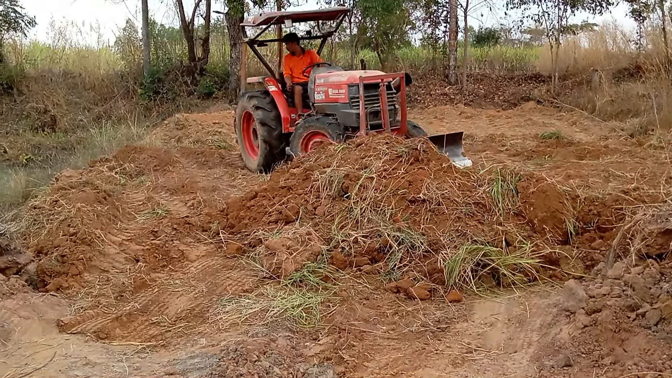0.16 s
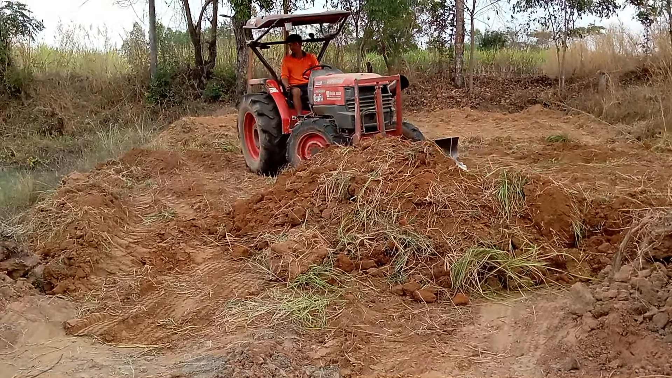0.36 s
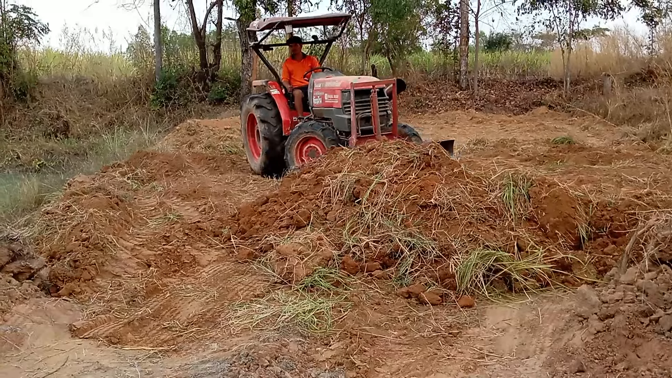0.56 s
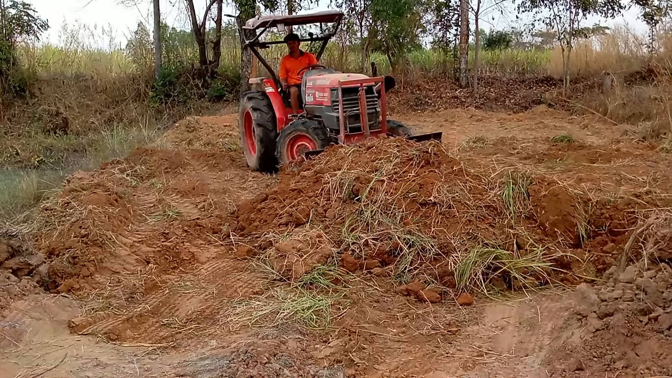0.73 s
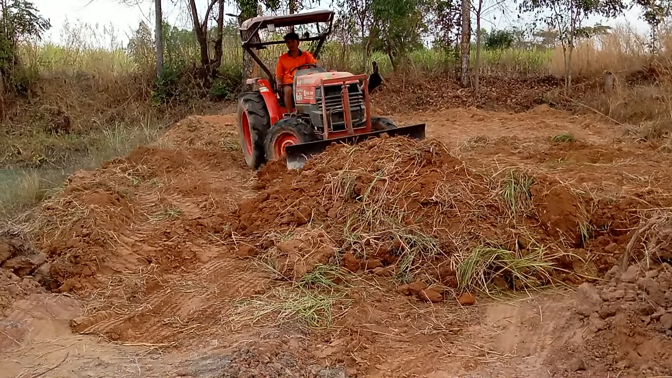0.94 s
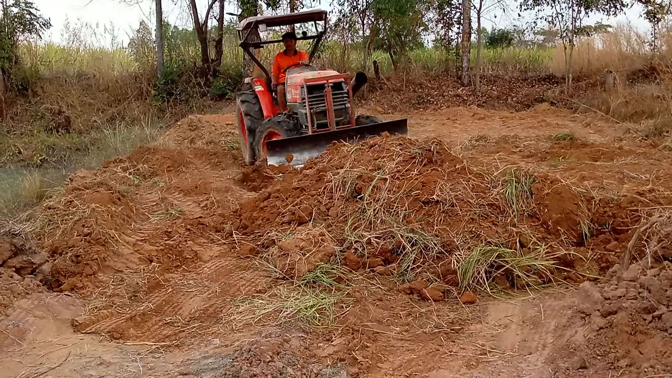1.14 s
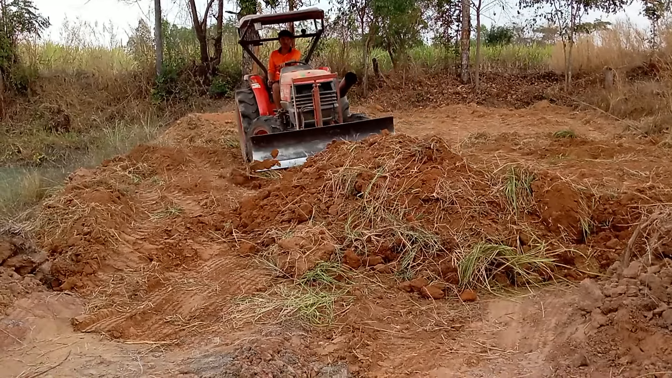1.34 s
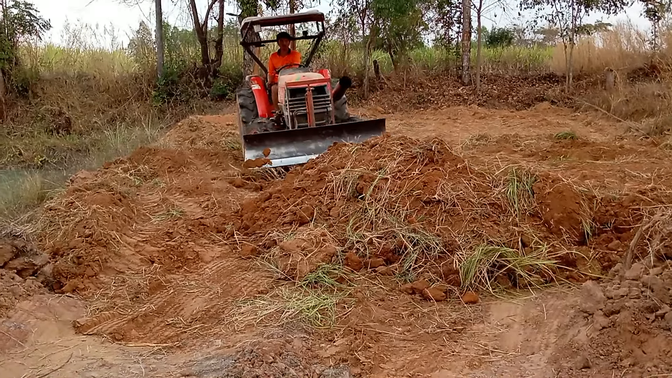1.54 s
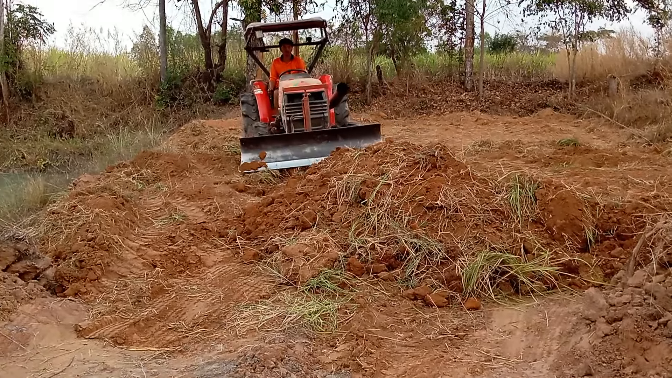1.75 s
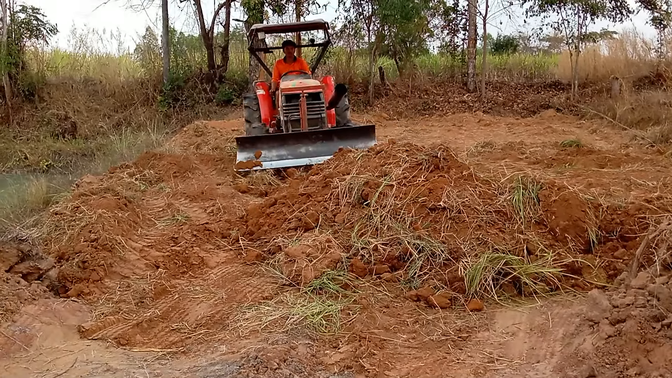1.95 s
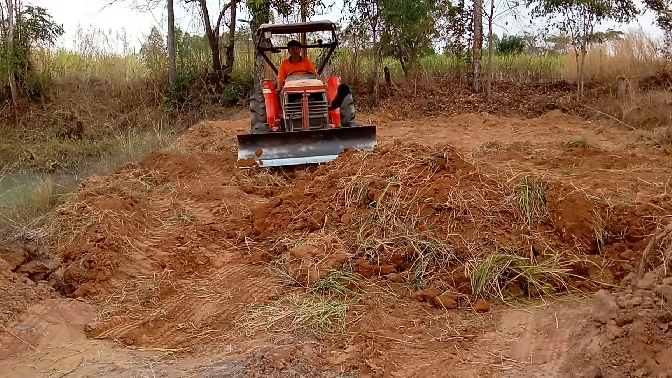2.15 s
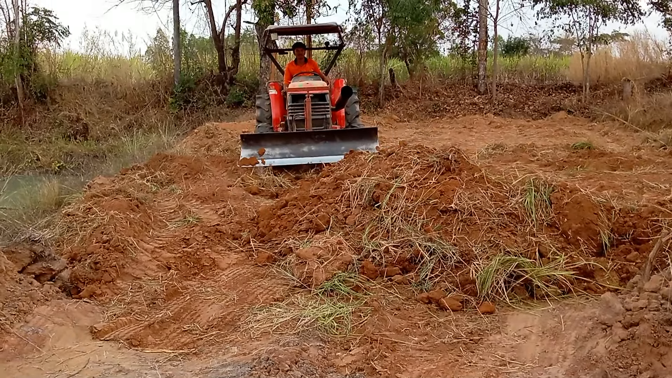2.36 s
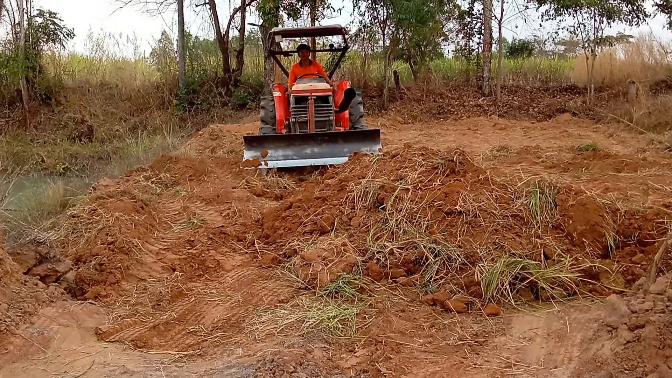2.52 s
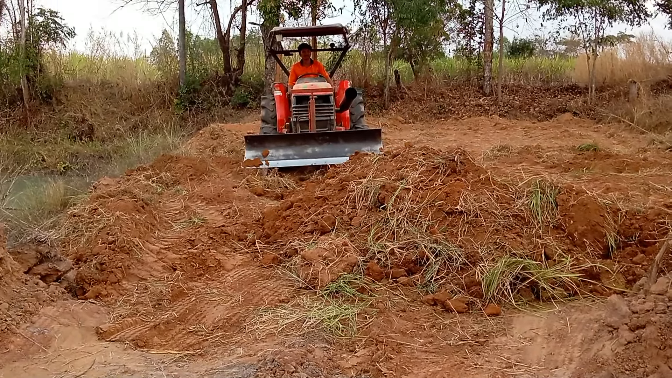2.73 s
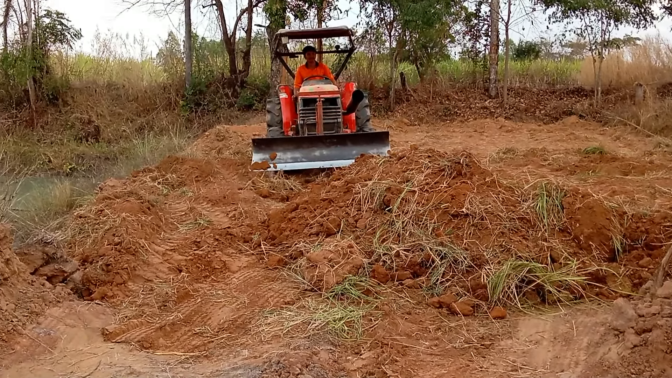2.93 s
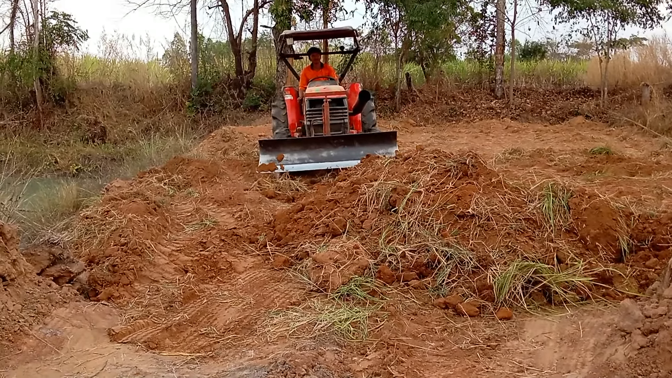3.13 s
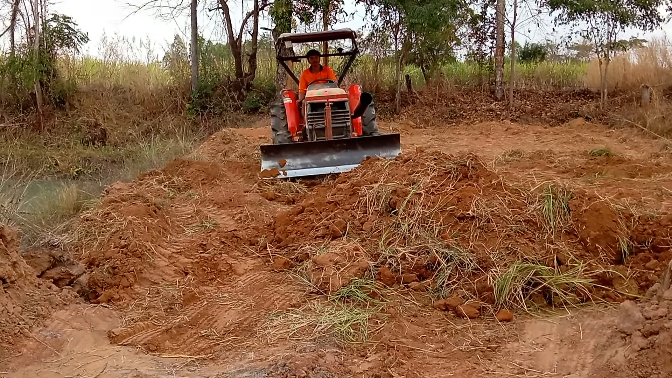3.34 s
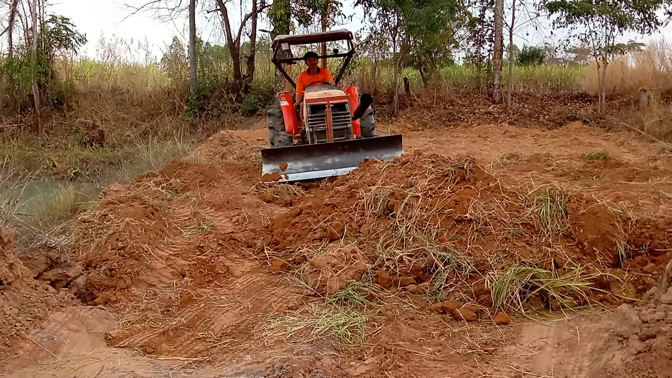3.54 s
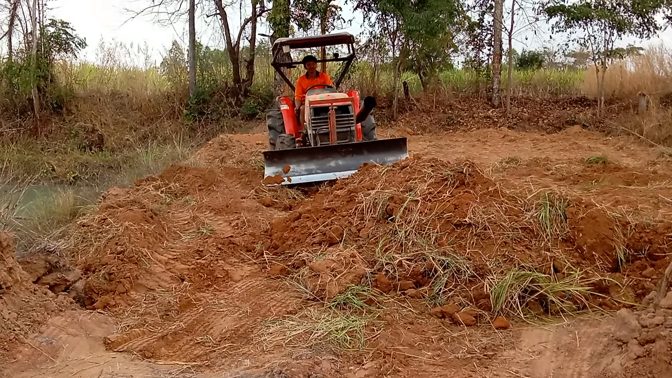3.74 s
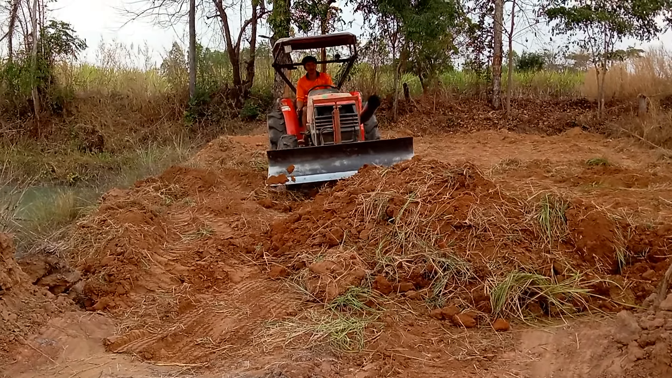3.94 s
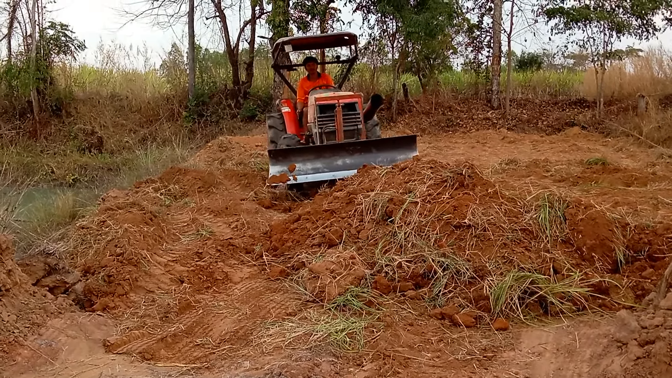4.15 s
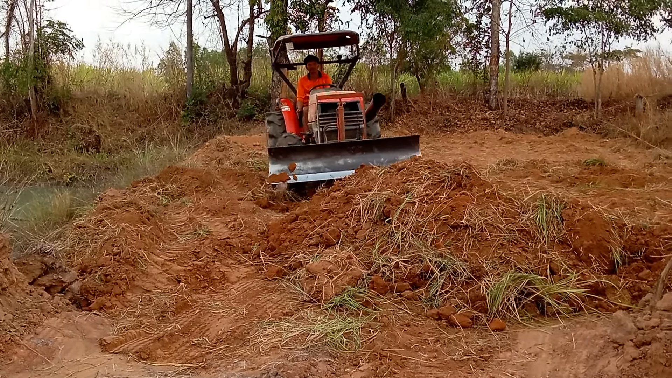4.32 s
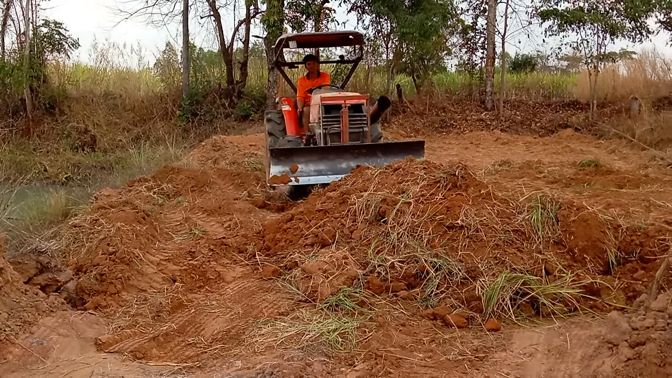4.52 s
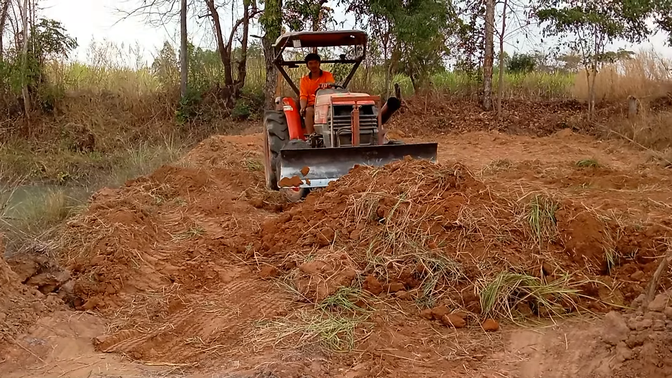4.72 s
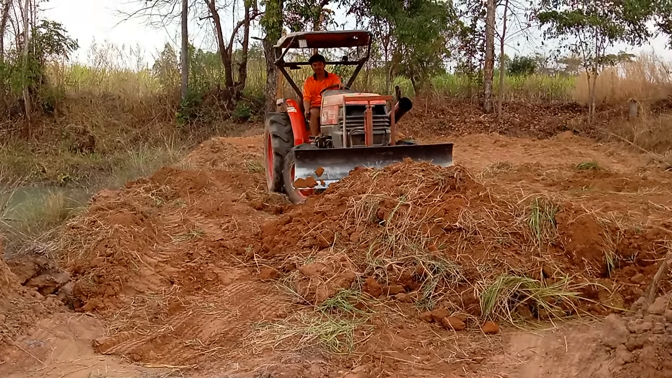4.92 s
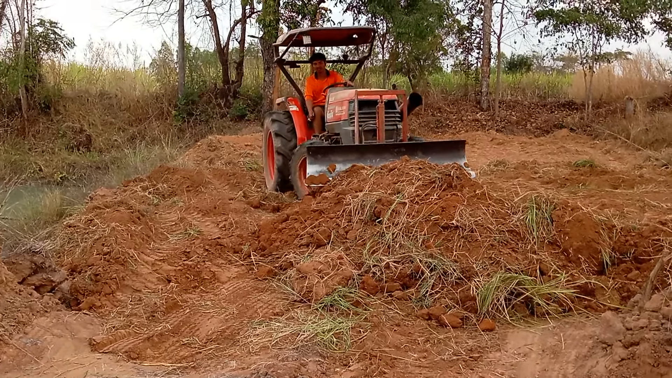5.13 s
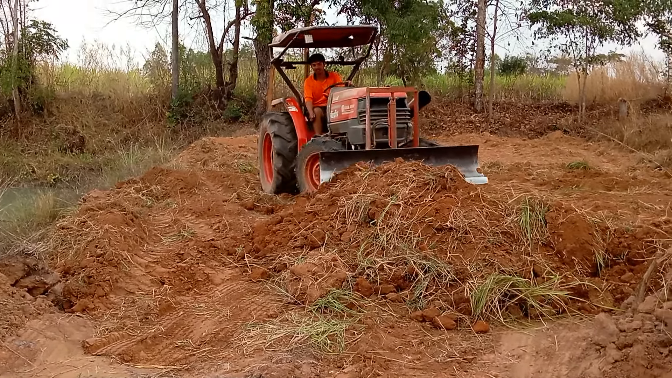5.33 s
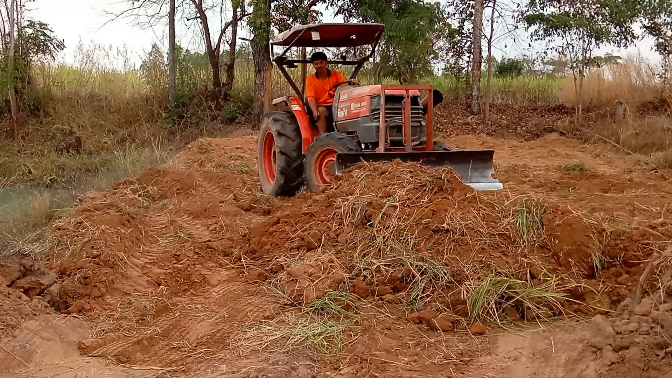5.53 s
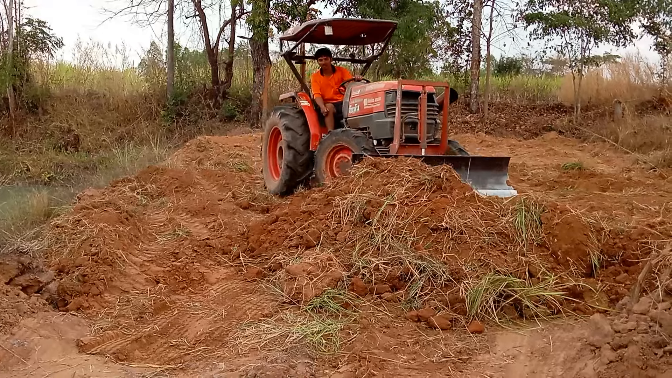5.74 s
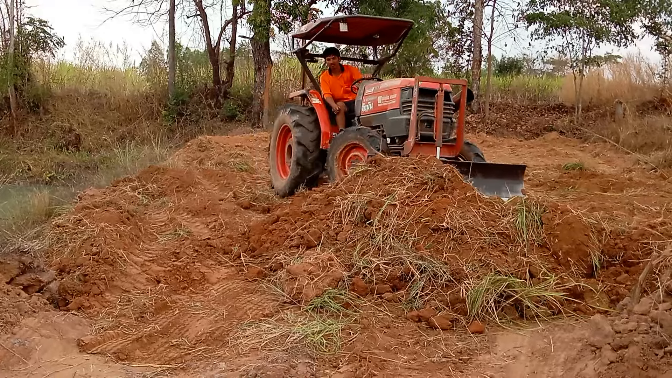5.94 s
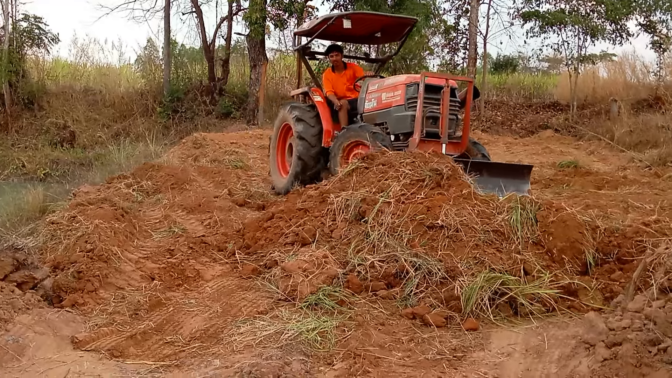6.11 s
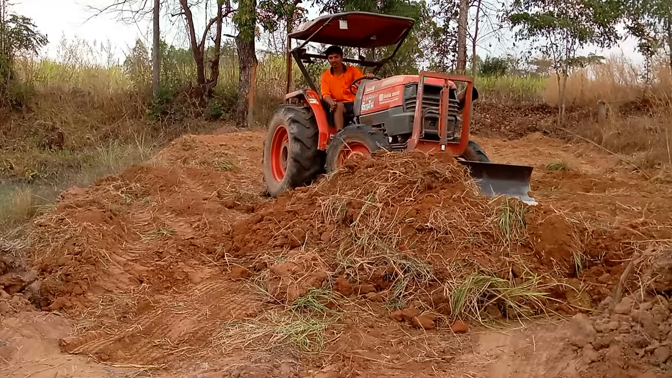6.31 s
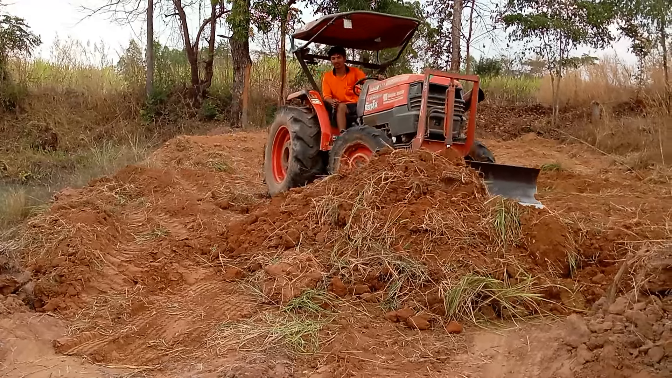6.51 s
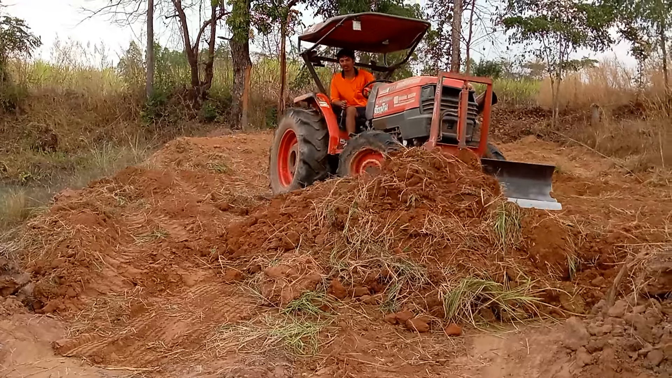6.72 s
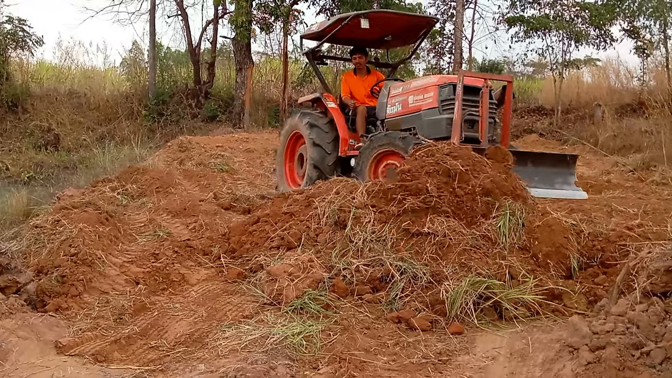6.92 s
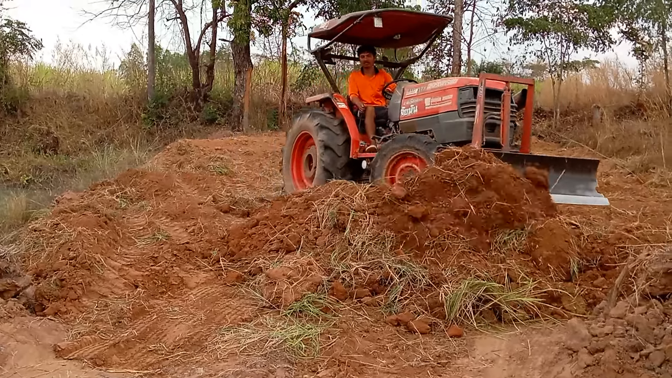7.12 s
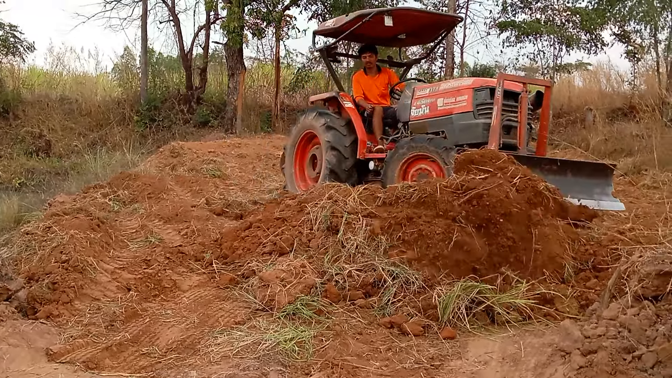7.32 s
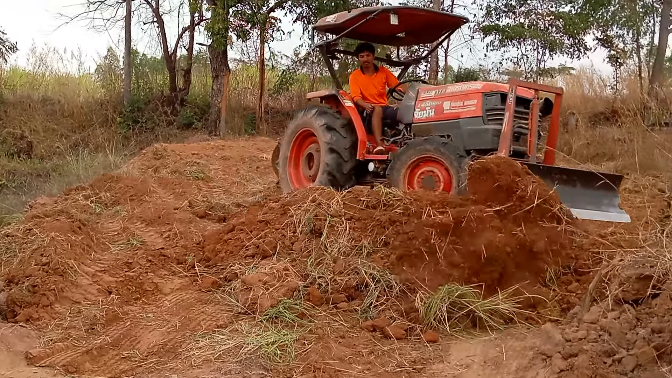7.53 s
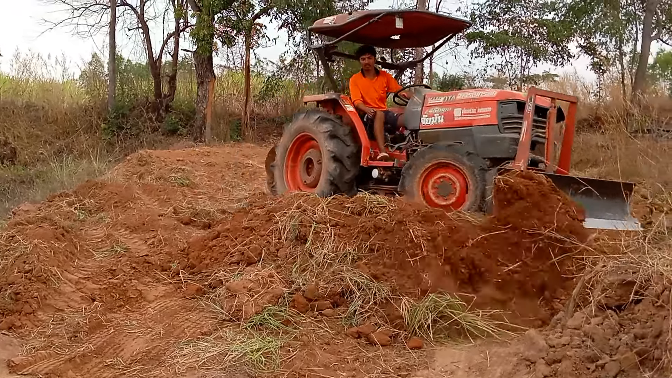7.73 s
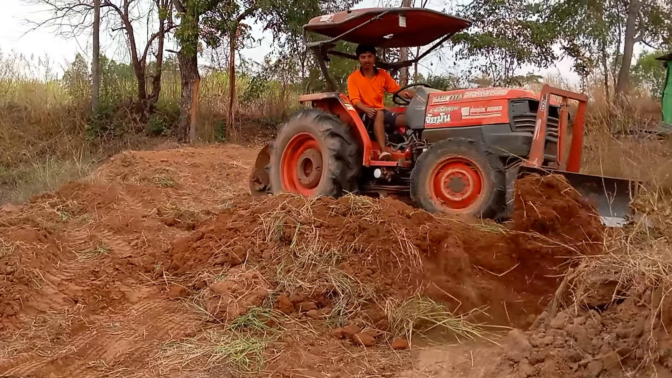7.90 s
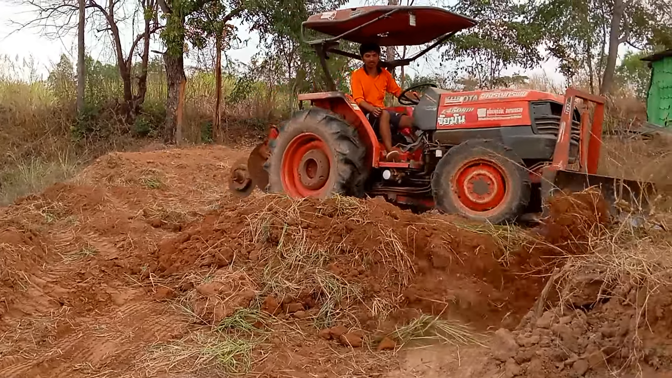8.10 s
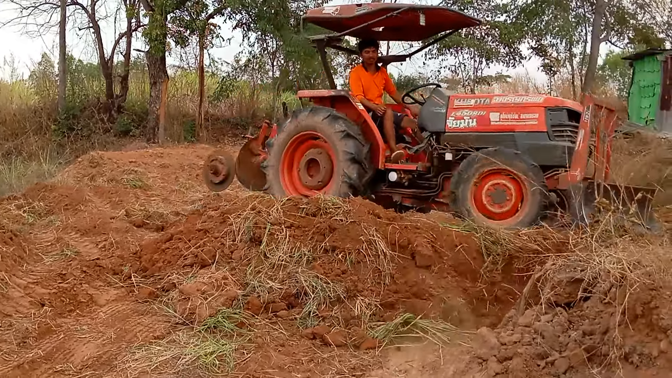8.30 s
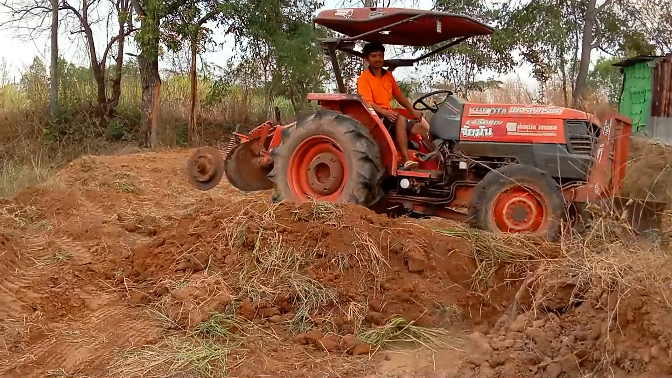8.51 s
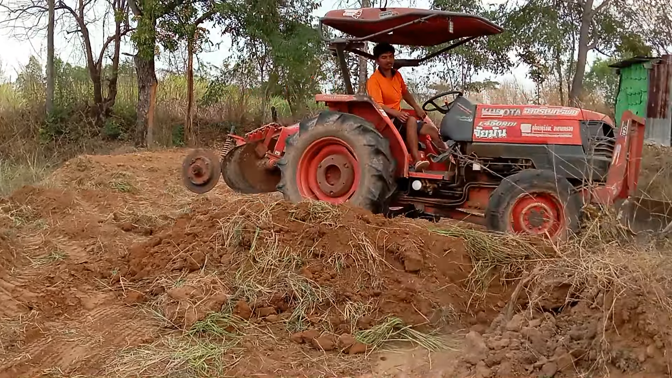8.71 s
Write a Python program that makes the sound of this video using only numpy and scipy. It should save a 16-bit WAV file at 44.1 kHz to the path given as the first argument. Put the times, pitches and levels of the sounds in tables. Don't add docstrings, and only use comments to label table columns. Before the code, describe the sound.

A diesel tractor clatters at idle, stumbles as its fuel cuts in and out, then revs up and pulls hard before easing off.

```python
import sys
import numpy as np
from scipy import signal
from scipy.fft import rfft, irfft, next_fast_len
from scipy.io import wavfile
from scipy.ndimage import uniform_filter1d

SR = 44100
rng = np.random.default_rng(int(sys.argv[2]) if len(sys.argv) > 2 else 0)


def waveform_to_disk(signal):
    frames = np.transpose(np.atleast_2d(signal))
    scaled = np.clip(frames, -1, 1) * 32767
    samples = np.round(scaled).astype(np.int16)
    wavfile.write(sys.argv[1], SR, samples)


def amplitude_ratio(level_db):
    exponent = np.asarray(level_db, float) / 20
    return 10 ** exponent


N = 386316
IDLE_INTERVAL = .035

# surplus of the exhaust puff [ratio], knock_db
CYLINDERS = [(1, -.4), (.25, -.3), (-1, .9), (-.25, .2)]
# middle_s, half_length_s
SURGES = [(2.1, .24), (2.448, .055), (2.744, .02), (2.866, .055), (3.119, .05)]
# start_s, knock_db on fuel, load [0-1], flank turned to the microphone [0-1]
WORK = [(0, -32.5, 0.62, 0.5), (.24, -32.5, .3, 0.54), (.62, -24.5, 0.08, 0.3), (1.1, -33, 0.03, 0.14),
        (1.8, -30.5, 0.1, 0), (3.285, -37, 0.04, 0.35), (3.34, -21.5, 0.2, 0.1), (3.8, -25, 0.28, 0.34),
        (4.3, -27, 0.38, 0.38), (5.05, -29, 0.37, 0.53), (5.55, -26.5, 0.53, 0.66), (5.85, -28, 0.86, 0.8),
        (6.5, -27, 0.94, 0.5), (6.8, -25, 0.79, 0.66), (7.3, -30.5, 0.77, 0.74), (7.6, -32, 0.79, 1),
        (8, -30.5, 0.7, 1), (8.4, -25, 0, 0.94)]


def exhaust(at, cylinder):
    # centre_hz, width_hz, level_db
    silencer = [(90.4, 15.7, 0.5), (110.2, 12.6, 0.5), (139, 50, -11)]
    tailpipe = [(170.6, 8.4, 0.5), (199.8, 17, 20)]
    manifold = [(110, 110, -3), (159.7, 59, 10), (227, 70, 7.5)]
    outlet = [(250, 16, 21.5), (403, 190, 4.5), (536, 62, 11.5), (655, 23, 16.5), (954, 110, -24),
              (1110, 34.5, 19)]
    # centre_hz, width_hz, level_db
    upright = [(261.4, 48, 0)]
    # pitch_hz, level_db
    flow = [(15, -32), (45, -18), (90, -14.5), (200, -4), (270, -12), (330, -11.5), (450, -44)]
    dry_scatter_db = 3.5
    leaky_cylinder, leak_db, leak_below = 3, 5.5, 30

    chance = rng.standard_normal((len(at), 2))
    dry_db = dry_scatter_db * chance[:, 1] + leak_db * (cylinder == leaky_cylinder)
    dry_db = (1.5 - fuel()[0][at]) * dry_db * (speed()[at] < leak_below)
    sizes = amplitude_ratio(.6 * chance[:, 0] + dry_db)
    surplus = np.transpose(CYLINDERS)[0, cylinder]

    def ring(table):
        return lambda f: modes(table)(f) * f ** 2 / (f ** 2 + 85 ** 2) / (1 + (f / 255) ** 12)

    def mouth(f):
        return modes(outlet)(f) * f ** 4 / (f ** 4 + 235 ** 4) / (1 + (f / 1100) ** 6)

    level = levels(lag_s=0)
    when = at - SR * 0.004575
    thump = played(when, sizes, level['thump'] - .4, ring(silencer))
    pipe = played(when, sizes, level['pipe'] - .4, ring(tailpipe))
    uneven = played(when, surplus, level['uneven'], ring(manifold))
    ragged = when + SR * .00005 * chance[:, 1]
    bark = played(ragged, sizes + 0.5 * surplus, level['bark'] - 6.5, mouth)
    rumble = amplitude_ratio(level['rumble']) * rush(slope(flow), patchy_db=1.0)
    stack = played(when, sizes, level['stack'], lambda f: modes(upright)(f) ** 3)
    return thump + pipe + stack + uneven + bark + rumble


def knock(at, cylinder):
    # centre_hz, width_hz, level_db
    block_modes = [(607, 67, -10), (1040, 153, -12.5), (1363, 120, -4), (2070, 574, -4), (2167, 86, 2),
                   (2303, 97, -8), (3337, 200, -8.5), (2498, 79, -8.5)]
    head_modes = [(4010, 540, 4), (4785, 106, -2.5), (5283, 140, 5), (6000, 210, -7), (6558, 148, 1),
                  (6620, 156, 1.5), (7220, 720, -8), (8510, 155, -11.5), (9110, 130, -9.5),
                  (10020, 290, -10.5), (10800, 380, -16.5), (12870, 1550, -10), (13900, 1370, -2)]
    edge_kept = 0.88

    _, knock_db, droop_db = fuel()
    level = levels(lag_s=0)
    chance = rng.standard_normal((len(at), 3))

    def angle(share):
        return np.clip(at + np.gradient(at) * share, 0, N).astype(int)

    start = angle(-.24 + .012 * chance[:, 0])
    own_db = knock_db[at] + np.transpose(CYLINDERS)[1, cylinder] + 1.3 * chance[:, 1]
    block = bursts(start, cylinder, block_modes, own_db + 4.5, rise_s=.0018, t60_s=.034,
                   scatter_db=4.5, level=level)

    soft_db = .9 * np.minimum(own_db + 40, 0) * 2
    edge_db = own_db + level['treble'][at] + soft_db + edge_kept * droop_db[at] + 2.7 * chance[:, 2]
    damped = [(c, 1.15 * w, db) for c, w, db in head_modes]
    head = bursts(start, cylinder, damped, edge_db, rise_s=.0025, t60_s=.024, scatter_db=4.5, level=level)

    seat_db = own_db - knock_db[at] + level['valves'][at]
    valves = bursts(angle(.36), cylinder, block_modes + head_modes[:6], seat_db, rise_s=.004, t60_s=.055,
                    scatter_db=4, level=level)
    return block + head + valves


def bursts(at, cylinder, table, level_db, rise_s, t60_s, scatter_db, level):
    size, habit = 1536, .7
    interval = np.gradient(at)
    pace = (IDLE_INTERVAL * SR / interval[:, None]) ** .8
    t = np.arange(size) / SR * pace
    shape = (1 - np.exp(-t / rise_s)) ** 2 * amplitude_ratio(-60 * t / t60_s)

    hz = np.fft.rfftfreq(size, 1 / SR)
    each = np.array([(-1) ** k * amplitude_ratio(db) * modes([(c, 1.5 * w, 0)])(hz) ** 2
                     for k, (c, w, db) in enumerate(table)])
    centre, now = np.transpose(table)[0], np.minimum(at, N - 1)
    shade_db = np.outer(level['shade'][now], (centre > 7200) & (centre < 12000))
    shade_db = shade_db + np.outer(level['top'][now], centre > 12000)
    colour = amplitude_ratio(scatter_db * rng.standard_normal((len(at), len(table))) + shade_db) @ each

    usual = rng.standard_normal((len(CYLINDERS), size))[cylinder]
    noise = habit * usual + np.sqrt(1 - habit ** 2) * rng.standard_normal((len(at), size))
    rows = irfft(rfft(shape * noise) * colour, size)
    energy = interval / np.sum(rows ** 2, axis=1)
    rows = rows * (np.sqrt(energy) * amplitude_ratio(level_db))[:, None]
    return np.bincount((at[:, None] + np.arange(size)).ravel(), rows.ravel())[:N]


def running_gear(count):
    # pitch_hz, level_db
    air = [(380, -27), (480, -6), (650, -3.5), (1400, -2.5), (2050, -2), (2500, -10), (3000, -8),
           (3500, -18.5), (3900, -74)]
    # centre_hz, width_hz, level_db
    teeth = [(3360, 400, 2.5), (5100, 460, 1.5), (6143, 410, 1.5), (6830, 340, 1), (7230, 360, -0.5),
             (7750, 300, -1.5), (8790, 580, -5), (9670, 510, -4), (10400, 570, -5.5)]
    # pitch_hz, level_db
    hiss = [(1760, -37), (3000, 15), (5920, 7), (7120, -24), (8110, -15), (10200, -51), (11000, -32),
            (14300, -54), (22000, -120)]
    level = levels(lag_s=0.11)
    throb = np.cos(2 * np.pi * (count - .05))
    body = amplitude_ratio(level['body'] - 2.0 + 1.52 * throb) * rush(slope(air), patchy_db=2.5)
    gears = amplitude_ratio(level['gears'] + 2 + 2.8 * throb) * rush(lambda f: modes(teeth)(f) ** 3, patchy_db=4.5)
    soil = amplitude_ratio(level['soil'] + 1.0 * throb) * rush(slope(hiss), patchy_db=4.5)
    return body + gears + soil


def crank():
    first_firing = .656
    count = first_firing + np.cumsum(speed()) / SR
    at = np.flatnonzero(np.diff(np.floor(count)) > 0)
    return count, at, np.arange(len(at)) % len(CYLINDERS)


def speed():
    # start_s, rate [firings per s]
    pull = [(0, 37.78), (.366, 26.59), (.715, 29.25), (1.914, 27.63), (2.068, 25.19), (3.311, 25.24),
            (3.579, 39.76), (4.168, 50.27), (4.561, 50.14), (4.805, 52.65), (5.277, 52.13), (5.619, 49.15),
            (5.976, 51.4), (6.505, 51.89), (7.273, 55.83), (7.607, 53.8), (7.8, 55), (7.96, 55.2)]
    coast_to, coast_s = 24, .79
    kick, kick_rise_s, kick_fade_s = 2.672, .1, .1274
    t = np.arange(N) / SR
    coasting = np.exp(-np.maximum(t - pull[-1][0], 0) / coast_s)
    rate = coast_to + (curves(pull)[0] - coast_to) * coasting
    for middle in np.transpose(SURGES)[0, 1::2]:
        since = t - middle + kick_rise_s / 2
        fade = np.exp(-np.maximum(since - kick_rise_s, 0) / kick_fade_s)
        rate = rate + kick * np.clip(since / kick_rise_s, 0, 1) * fade
    return rate


def fuel():
    # start_s, end_s
    cuts = [
        (1.845, 3.27),
        (8.005, 9),
    ]
    # peak knock_db, share of full fuel [0-1]
    doses = [(-42, 0.63), (-24, 0.8), (-42, 0), (-27.5, 0.69), (-41, 0.83)]
    droop_per_firing_db, dry_knock_db = 7.5, -51.5
    t = np.arange(N) / SR
    share = 1. - sum((t > a) & (t < b) for a, b in cuts)
    knock_db = np.where(share > 0, curves(WORK)[0], dry_knock_db)
    droop_db = np.zeros(N)
    for (middle, half), (peak_db, part) in zip(SURGES, doses):
        inside = np.abs(t - middle) < half
        share = np.where(inside, np.clip(part, 0, 1), share)
        drop_db = droop_per_firing_db * ((t - middle) / IDLE_INTERVAL) ** 2
        drop_db = np.minimum(drop_db, max(peak_db - dry_knock_db, 0))
        knock_db = np.where(inside, peak_db - drop_db, knock_db)
        droop_db = np.where(inside, drop_db, droop_db)
    return share, knock_db, droop_db


def lingering(share):
    ramp = np.cumsum(speed()) / SR / 0.96
    return np.exp(np.maximum.accumulate(np.log(share + 1e-9) + ramp) - ramp)


def levels(lag_s):
    # idle_db, per_octave_of_speed_db, full_load_db, side_on_db, per_knock [dB per dB], no_fuel_db
    laws = dict(thump=(-29.5, 4, -3.5, 5.5, 0.24, -10), pipe=(-34.5, 12, 8.5, -3, .5, -7.5),
            bark=(-56, 16.5, 17, 5.5, 0.52, 4), uneven=(-40, 3.5, 3, 8, 0.57, -13),
            stack=(-65, 9, 16, 11.5, -0.85, -7), treble=(-8.5, -3.2, 5.5, 0, 0.74, -13),
            valves=(-57.5, 31.5, -21, -4, 0.7, 0.5), shade=(5, 3, -6, -8.5, -0.18, 9),
            rumble=(-42.5, 8, -3, 5, .3, -12), top=(-4, -1, 2.2, 0, 0.4, 3),
            body=(-30.5, 8.5, 1, 2.73, 0.21, -6.5), gears=(-52, 11, 2.5, 1, 0.3, -2.5),
            soil=(-63.5, 5.5, 13.5, 13.5, 2.35, -2))
    usual_knock_db = -29.5
    share, knock_db, droop_db = fuel()
    _, load, flank = curves(WORK)

    def slow(v):
        return uniform_filter1d(v, size=int(lag_s * SR) + 1)

    octaves = np.log2(speed() * IDLE_INTERVAL)
    harder_db = slow(share * (knock_db + droop_db - usual_knock_db))
    state = [np.ones(N), octaves, load, flank, harder_db, slow(1 - lingering(share))]
    return {part: np.dot(law, state) for part, law in laws.items()}


def unit(x):
    return x / np.sqrt(np.mean(x ** 2) + 1e-20)


def along(points, hz):
    f, v = np.transpose(points)
    return np.interp(np.log(hz + 1), np.log(f + 1), v)


def slope(points):
    return lambda hz: amplitude_ratio(along(points, hz))


def curves(rows):
    s, *cols = np.transpose(rows)
    return [np.interp(np.arange(N) / SR, s, c) for c in cols]


def filtered(x, response):
    m = next_fast_len(N + SR // 8)
    return irfft(rfft(x, m) * response(np.fft.rfftfreq(m, 1 / SR)), m)[..., :N]


def modes(table):
    return lambda f: sum((-1) ** k * amplitude_ratio(db) * 1j * f * w / (c * c - f * f + 1j * f * w)
                         for k, (c, w, db) in enumerate(table))


def played(at, sizes, level_db, response):
    at = np.clip(at.astype(int), 0, N - 1)

    def sound(g):
        return filtered(np.bincount(at, g, N), response)

    plain = np.sqrt(np.abs(uniform_filter1d(sound(sizes) ** 2, size=SR // 6)) + 1e-20)
    return sound(sizes * amplitude_ratio(level_db[at]) / plain[at])


def rush(colour, patchy_db):
    z = signal.stft(rng.standard_normal(N), nperseg=256)[2]
    patches = uniform_filter1d(rng.standard_normal(z.shape), size=3, axis=0)
    patches = uniform_filter1d(patches, size=8, axis=1)
    noise = signal.istft(z * amplitude_ratio(patchy_db * unit(patches)), nperseg=256)[1][:N]
    return unit(filtered(noise, colour))


def field(x):
    # pitch_hz, t60_s
    decay = [(100, 0.94), (1000, 0.024), (4000, 0.19), (12000, 0.037)]
    hz, t, z = signal.stft(rng.standard_normal(SR // 3), SR, nperseg=256)
    tail = signal.istft(z * amplitude_ratio(-60 * t / along(decay, hz)[:, None]), SR, nperseg=256)[1]
    return signal.fftconvolve(np.pad(x, (500, 0)), tail / np.linalg.norm(tail))[:N]


def ground(tractor):
    # centre_hz, width_hz, depth_db
    bounce = [(363, 185, 5.7), (1129, 296, 21), (1716, 600, 22.7), (2339, 103, 29), (2908, 880, 22),
              (3770, 590, 1), (4230, 340, 3.3), (5190, 560, 4.7)]

    def dips(f):
        return np.prod([1 / (1 + modes([(c, w / amplitude_ratio(db), db)])(f)) for c, w, db in bounce], axis=0)

    filled = .14 * curves(WORK)[2]
    return (1 - filled) * filtered(tractor, dips) + filled * tractor


def scene():
    count, at, cylinder = crank()
    blows = knock(at, cylinder)
    tractor = exhaust(at, cylinder) + blows + running_gear(count) + amplitude_ratio(-22.5) * field(blows)
    return ground(tractor)[None]


def roll_off(x):
    return signal.sosfilt(signal.butter(12, 16820, fs=SR, output="sos"), x)


def record(dry):
    # pitch_hz, level_db
    microphone = [(10500, -2.18), (12000, -12), (13300, -33), (14600, -26), (15800, -15)]
    top_hz = 15940
    heard = filtered(dry, lambda hz: slope(microphone)(hz) * (hz < top_hz))
    return roll_off(heard)


dry = scene()
out = record(dry)
waveform_to_disk(out)
```